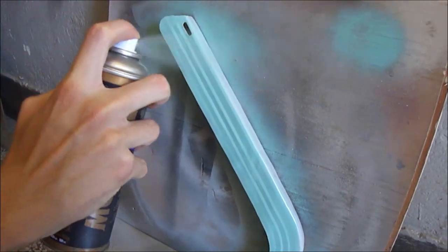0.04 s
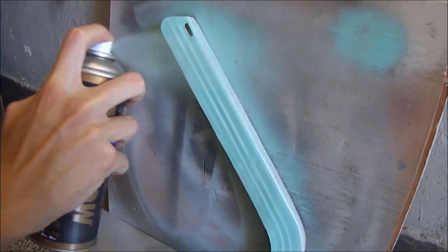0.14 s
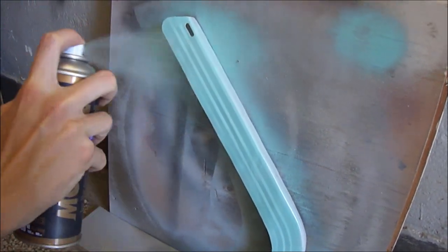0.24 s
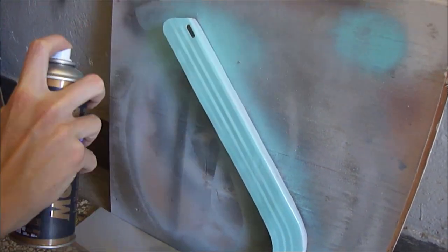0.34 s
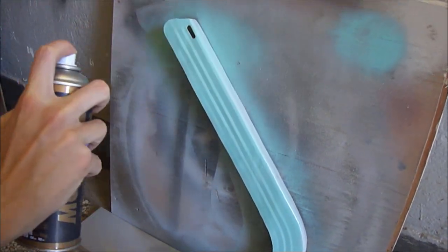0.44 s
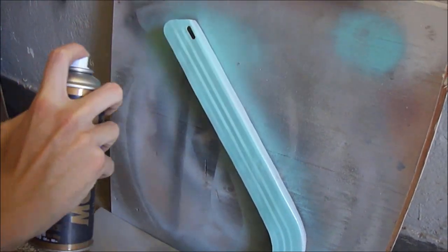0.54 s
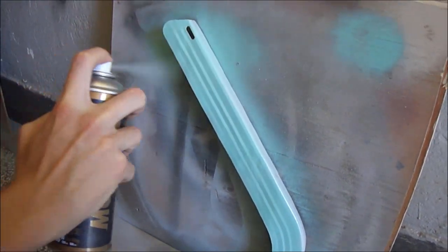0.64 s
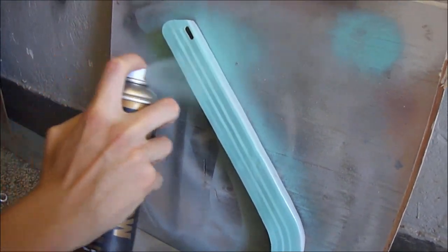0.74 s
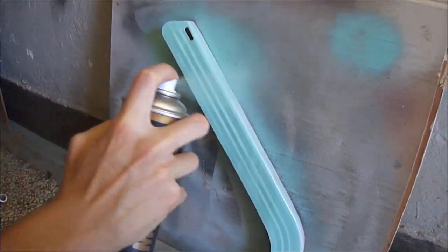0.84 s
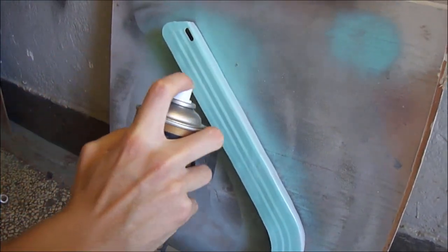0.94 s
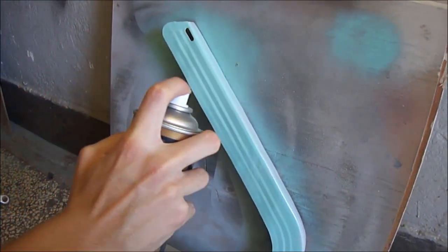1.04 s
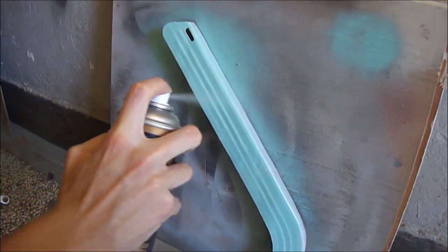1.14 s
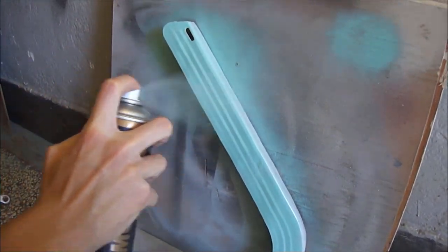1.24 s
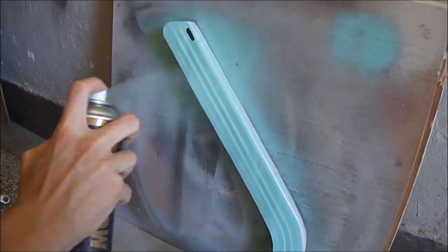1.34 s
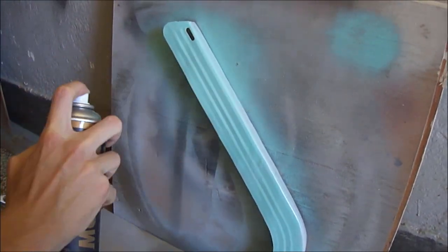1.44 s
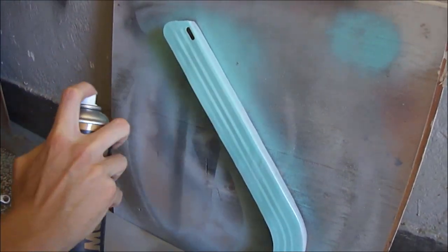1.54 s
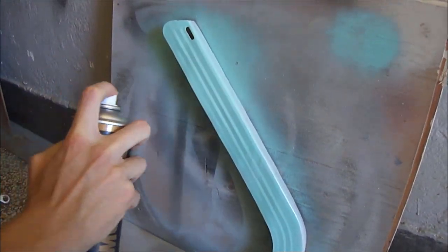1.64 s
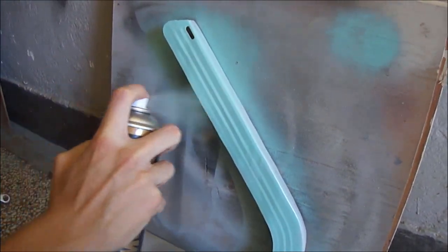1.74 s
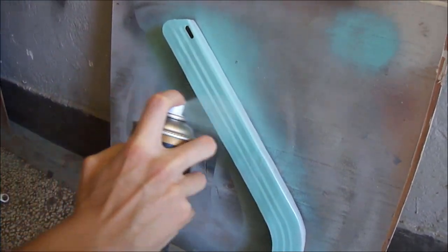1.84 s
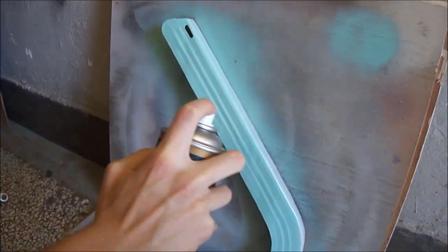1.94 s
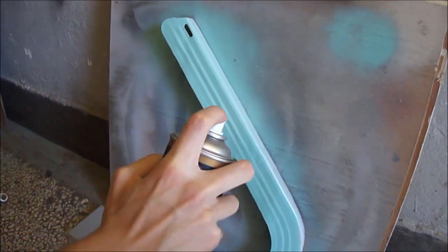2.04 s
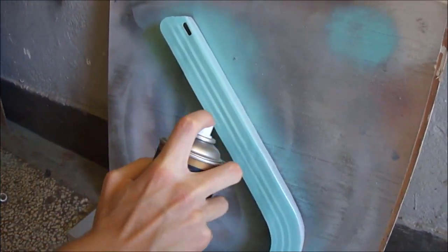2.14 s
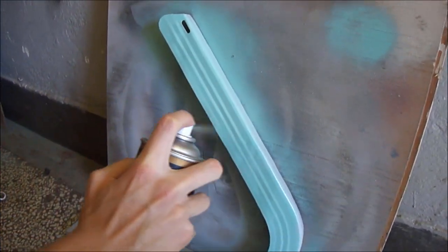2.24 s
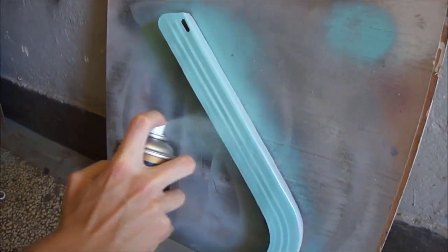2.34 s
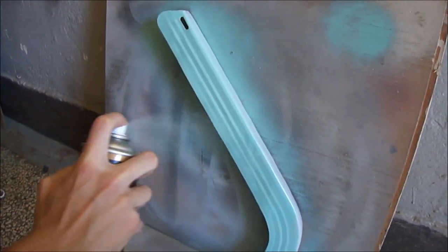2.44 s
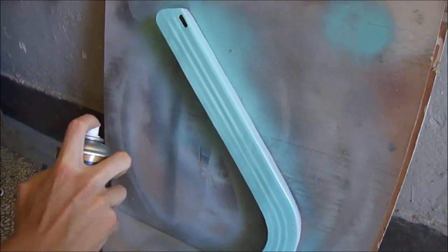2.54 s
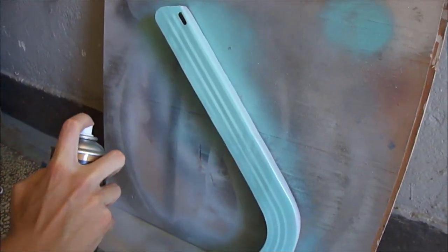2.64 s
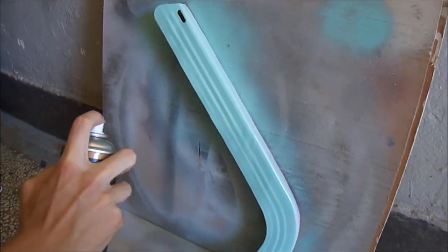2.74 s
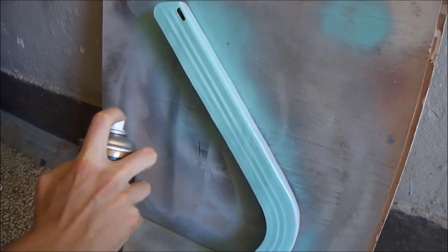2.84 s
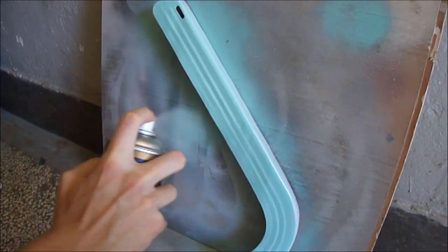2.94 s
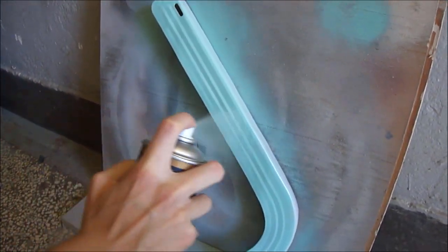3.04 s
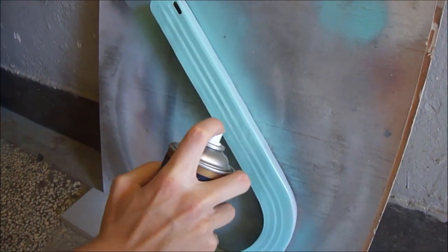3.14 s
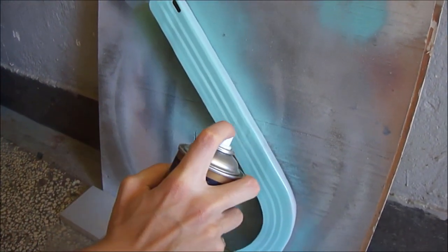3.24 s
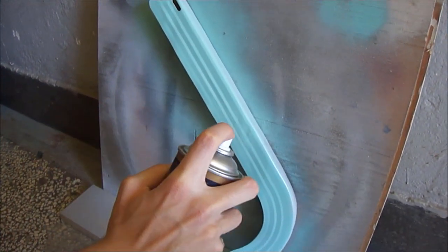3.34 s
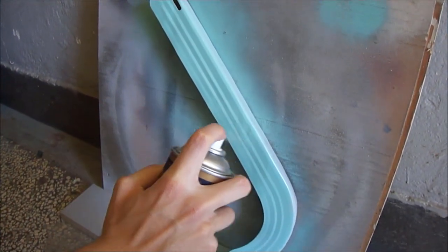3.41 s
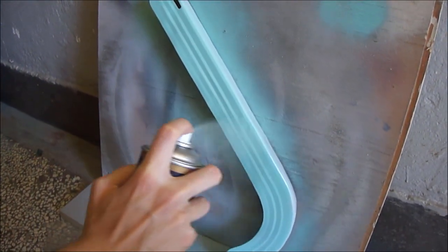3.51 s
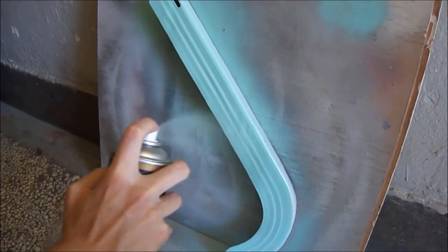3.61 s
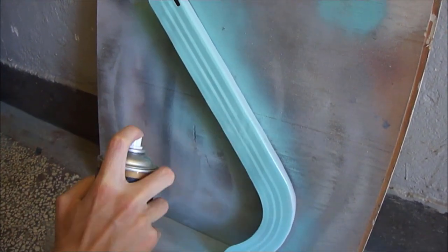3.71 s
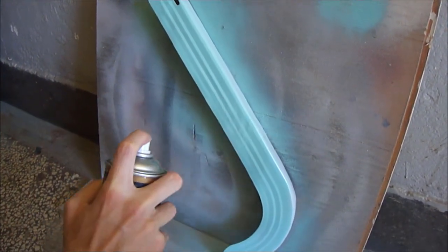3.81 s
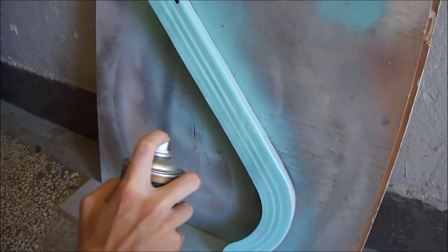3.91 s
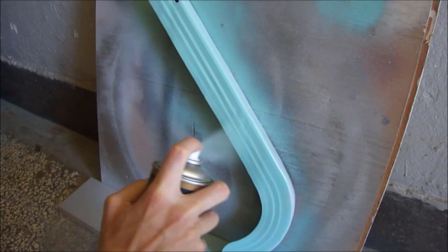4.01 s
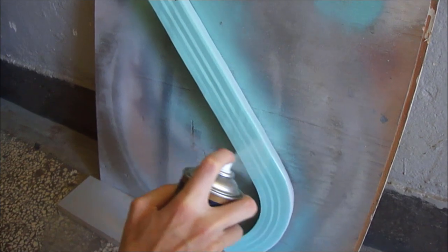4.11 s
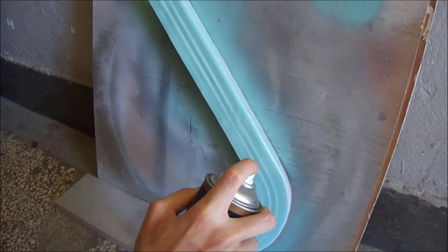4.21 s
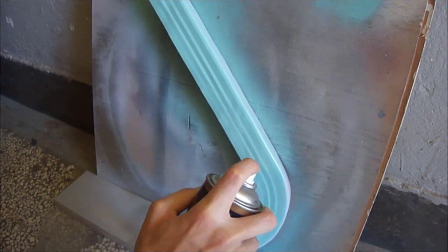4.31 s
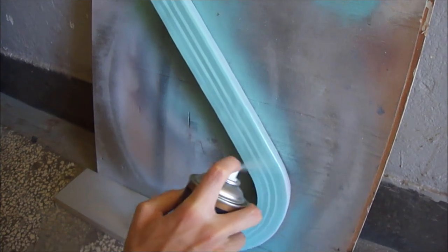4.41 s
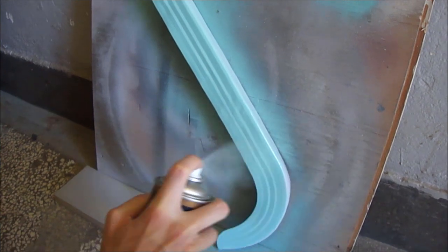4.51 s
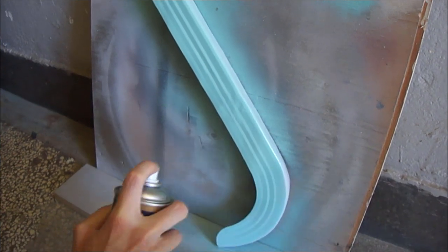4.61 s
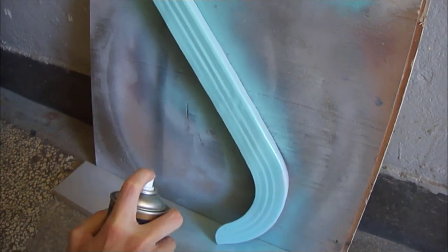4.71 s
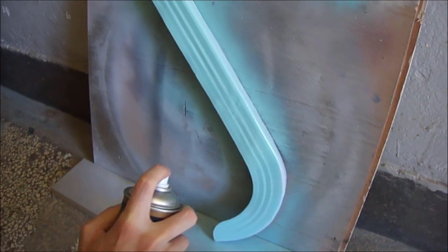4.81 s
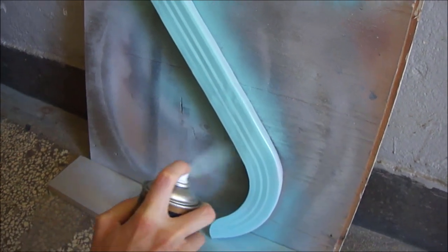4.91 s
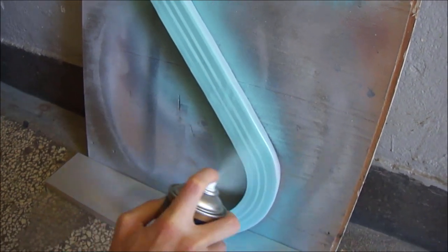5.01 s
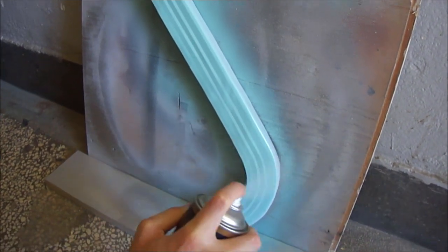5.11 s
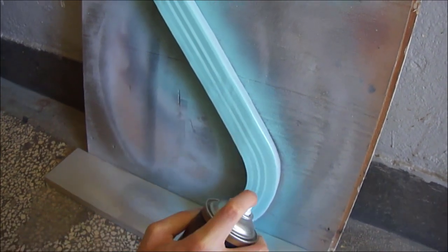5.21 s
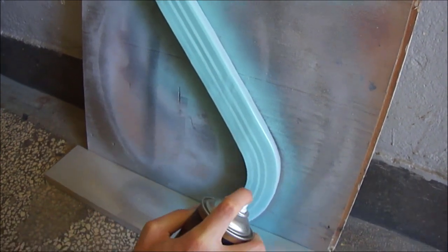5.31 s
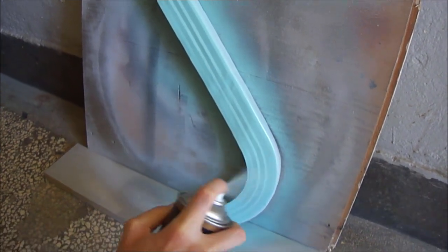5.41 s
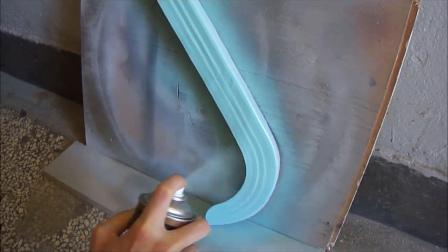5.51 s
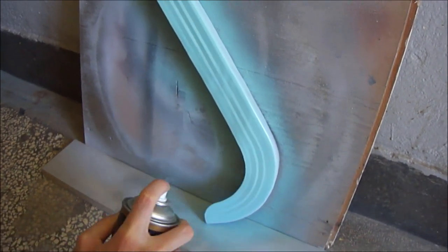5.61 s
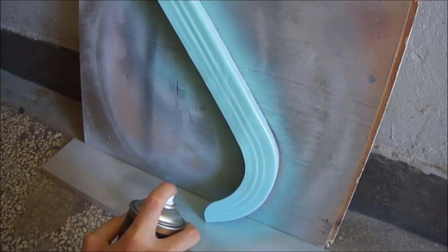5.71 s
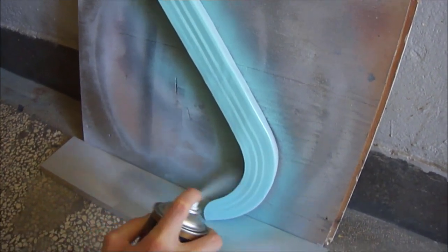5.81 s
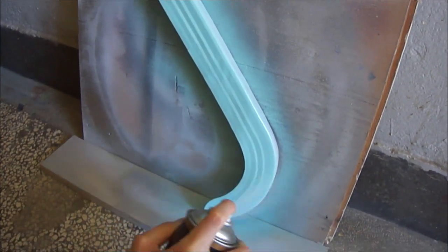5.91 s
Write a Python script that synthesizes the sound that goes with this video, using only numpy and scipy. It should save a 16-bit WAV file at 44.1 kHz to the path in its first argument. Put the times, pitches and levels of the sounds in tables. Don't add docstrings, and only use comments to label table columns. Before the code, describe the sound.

A spray can works close to a small mono microphone in a bare, lightly ringing workshop. Soft room air and a very faint low machine hum run throughout. The first burst opens almost at once with a hard cap tick at 0.08 s and hisses until about 0.36 s. Further bursts start near 0.65, 1.15, 1.7, 2.27, 2.9, 3.45, 3.97, 4.43, 4.9, 5.4 and 5.83 s, each lasting roughly 0.2 to 0.3 s, the last running to about 6 s. Each seeps, cracks open within some 50 ms, surges into bright hiss with rough body, fine fizz and a breathy whistle near 2.4 kHz, usually weakens, then shuts quickly. A strong tick comes at 1.19 s, another around 3.07 s, with fainter clicks and sputters scattered between. Close reflections give a shifting, hollow comb colour; a short tail fades into each quiet gap. Highs stop near 11 kHz.

```python
import sys
import numpy as np
from scipy import signal
from scipy.fft import rfft, irfft, next_fast_len
from scipy.io import wavfile
from scipy.ndimage import uniform_filter1d, map_coordinates

SR = 44100
rng = np.random.default_rng(int(sys.argv[2]) if len(sys.argv) > 2 else 0)


def volts(x):
    e = np.asarray(x, float) / 20
    return 10 ** e


def log_audio(samples):
    frames = np.atleast_2d(samples).T
    limited = np.clip(frames, -1, 1)
    pcm = np.round(limited * 32767).astype(np.int16)
    wavfile.write(sys.argv[1], SR, pcm)


N = 262836

# pitch_hz, level_db
AIR_COLOUR = [(25, -29), (60, -13.5), (85, -12.5), (130, -6.5), (200, -6), (320, -2), (500, -1), (1000, -2),
              (1500, -5.5), (2100, -11), (3000, -13.5), (6000, -19), (11000, -24)]
# pitch_hz, width_hz, level_db
STANDING_WAVES = [(100, 10, 9), (229, 9.1, 3.5), (396, 16, 2.5), (463, 13, 3.5), (557, 17, 2.5),
                  (2240, 67, 8.5), (7800, 90, 6)]
# pitch_hz, level_db (rms)
MACHINE_HUM = [(143, -70), (270.5, -58)]
# pitch_hz, t60_s
ROOM_DECAY = [(500, 0.92), (2500, 0.56), (6000, 0.53), (11000, 0.4)]

# surge_delay_ms, shut_delay_ms, surge_share, shut_share
BOARD_PATH = [(1.045, .935, .85, .3), (.865, .885, .22, .5), (.865, .865, .36, .1), (.785, .825, .12, .55),
              (.8, .83, .25, .36), (.835, .785, .3, .65), (.755, .825, .7, .08), (.735, .675, .22, .65),
              (.68, .74, .5, .1), (.66, .74, .15, .28), (.685, .785, .36, .2), (.615, .625, .05, .42)]
# surge_delay_ms, shut_delay_ms, surge_share, shut_share
RAIL_PATH = [(1.175, 1.125, .1, .3), (1.11, 1.13, .2, .33), (1.075, 1.175, .25, .08),
             (.925, .935, .05, .48), (1.01, .92, .08, .32), (.945, .935, .18, .18), (1.52, 1.47, .05, .42),
             (.87, .8, .24, .3), (1.285, 1.225, .33, .33), (1.195, 1.145, .24, .22), (1.05, 1.0, .52, .05),
             (1.225, 1.225, .46, .14)]
# surge_delay_ms, shut_delay_ms, surge_share, shut_share
CORNER_PATH = [(2.07, 1.89, .25, .15), (1.865, 1.855, .22, .1), (1.48, 1.43, .17, .1),
               (1.74, 1.73, .2, .12), (1.655, 1.515, .38, .12), (1.69, 1.79, .28, .12),
               (1.88, 1.81, .15, .22), (1.565, 1.505, .2, .28), (1.43, 1.37, .22, .17),
               (.535, .525, .4, .14), (.6, .65, 0, .45), (.47, .51, .12, .3)]
MIRROR = 1.3

# start_s, level_db (peak), pitch_hz, width_hz
CAP_TICKS = [(0.0842, -8.5, 4170, 5000), (0.5064, -25, 4800, 9000), (.547, -36, 5500, 3000),
             (1.032, -34, 4700, 2500), (1.051, -32, 5600, 3000), (1.1, -34, 4500, 8000),
             (1.118, -39, 5000, 2500), (1.131, -50, 5600, 2000), (1.162, -21, 4500, 12000),
             (1.186, -9, 3960, 4970), (1.588, -30.5, 5700, 5000), (1.62, -31.5, 5500, 4000),
             (1.73, -24, 10400, 2500), (2.086, -34, 5000, 3000), (2.1173, -32.5, 5600, 4000),
             (2.134, -32, 6000, 4000), (2.266, -36, 6000, 8000), (2.8182, -24.5, 2000, 9000),
             (2.9127, -22.5, 1160, 1210), (3.072, -14.5, 5500, 6900), (3.2445, -21, 3620, 3600),
             (3.972, -38, 6000, 9000), (5.83, -30, 4000, 5000)]

# open_s, surge_s, shut_s, surge_db, late_db
PRESSES = [(0.033, 0.057, 0.36, -23.5, -27.5), (0.644, 0.707, 0.9, -23, -28),
           (1.153, 1.193, 1.439, -24.5, -31), (1.721, 1.769, 1.95, -25, -27),
           (2.265, 2.322, 2.534, -23, -29.5), (2.878, 2.917, 3.148, -26, -24),
           (3.446, 3.479, 3.699, -21, -27.5), (3.967, 4.015, 4.204, -25, -26),
           (4.434, 4.470, 4.628, -21, -29.5), (4.907, 4.947, 5.17, -28.5, -25.5),
           (5.396, 5.440, 5.587, -24.5, -28.5), (5.826, 5.865, 6.015, -25.5, -33.5)]
# crack_part (of the rise, 0-1), sag_place (in the hold, 0-1), sag_db
FINGER_FEEL = [(0.5, .45, -2.5), (0.37, 0.2, -2), (.4, 0.2, -1), (0.39, 0, -0.5), (0.34, 0.2, -2),
               (0.37, 0.33, -4), (0.29, 0.55, -4), (0.44, 0.4, -2.5), (0.29, 0.1, -1), (0.39, 0.3, -1),
               (0.39, 0.2, -3), (0.4, 0.5, 0)]
# whistle_open_db, whistle_shut_db, fizz_open_db, fizz_shut_db, roar_db
NOZZLE_AIM = [(-3.5, -0.76, -.5, 0.44, 0.5), (-0.5, -0.75, -2, -1.5, -0.5), (-0.5, -0.63, -2.5, 0.23, -0.5),
              (-0.5, -0.63, 0.5, -0.13, 0), (5, -3, -2, 2, -0.5), (1, 1, 2, -0.83, 0),
              (4, 0.52, -2.5, 1.7, 1), (-1, -0.35, 0, -1.3, 0.5), (2.5, 0.65, -0.5, 2.1, 1),
              (6, 0, 2, -2.2, 0.5), (5, -0.13, 0, 0.5, 0), (-5, 1.7, 2, -0.29, 1.5)]
# pitch_hz, level_db
ROAR_COLOUR = [(150, -30), (300, -16.5), (500, -11.5), (800, -3.5), (1100, -2.5), (1550, 0), (2000, -0.5),
               (2800, -9.5), (4500, -18)]
# pitch_hz, level_db
HISS_COLOUR = [(1800, -32.5), (2800, -8.5), (3600, -4.5), (4800, -0.5), (6300, -1), (7600, -5.5),
               (9500, -19)]
# pitch_hz, level_db
FIZZ_COLOUR = [(5500, -39.5), (7000, -3.5), (8300, 0.5), (9500, 3), (10800, 5.5), (14000, -4.5)]
# pitch_hz, width_hz, level_db
CAP_HOLLOW = [(2476, 107, -0.5), (2256, 284, -8)]

SEEP_DB = -66
CRACK_DB, KNEE_DB = -14.5, -4.5
LIFT_S, LIFT_DB = 0.031, -4
USUAL_DB, WEAKEST_DB = -27, -35
ROAR_DB, FIZZ_DB = -10, -2.5
ROAR_LAGS, FIZZ_LAGS = 0.36, 0.58
WHISTLE_DB, WHISTLE_START_DB, WHISTLE_BUILDS_S = -7, -8, 0.02

# pitch_hz, width_hz, level_db
MIC_PORT = [(2315, 580, 2.5), (8000, 260, 2)]
TOP_HZ = 11060


def unit(x):
    return x / np.sqrt(np.mean(x ** 2) + 1e-20)


def along(points, hz):
    f, v = np.transpose(points)
    return np.interp(np.log(hz + 1), np.log(f + 1), v)


def curve(rows):
    s, value = np.transpose(rows)
    return np.interp(np.arange(N) / SR, s, value)


def per_press(at_opening, at_shutting):
    rows = []
    for press, first, last in zip(PRESSES, at_opening, at_shutting):
        rows += [(press[1], first), (press[2], last)]
    return curve(rows)


def wobble(rate):
    knots = rng.standard_normal(int(N * rate / SR) + 4)
    return map_coordinates(knots, [np.arange(N) * rate / SR])


def filtered(x, response):
    m = next_fast_len(N + SR // 2)
    return irfft(rfft(x, m) * response(np.fft.rfftfreq(m, 1 / SR)), m)[..., :N]


def resonance(f, hz, width):
    return 1j * f * width / (hz * hz - f * f + 1j * f * width)


def peaks(f, modes):
    return 1 + sum((volts(db) - 1) * resonance(f, hz, width) for hz, width, db in modes)


def rush(spectrum, patchy_db):
    z = signal.stft(rng.standard_normal(N + 512), nperseg=512)[2]
    field = uniform_filter1d(rng.standard_normal(z.shape), size=5, axis=0)
    field = uniform_filter1d(field, size=8, axis=1)
    noise = signal.istft(z * volts(patchy_db * unit(field)), nperseg=512)[1][:N]
    return unit(filtered(noise, lambda hz: volts(along(spectrum, hz))))


def background():
    t = np.arange(N) / SR
    drift = np.cumsum(wobble(9)) / SR
    hum = 0
    for hz, db in MACHINE_HUM:
        level = volts(db + 2.0 + 2.5 * wobble(14))
        hum = hum + level * np.sin(2 * np.pi * hz * (t + 0.013 * drift))
    air = filtered(rush(AIR_COLOUR, patchy_db=1.77), lambda f: peaks(f, STANDING_WAVES))
    return volts(-46.0 + 0.16 * wobble(2.2)) * air + hum


def workshop(x):
    hz, t, z = signal.stft(rng.standard_normal(SR), SR, nperseg=256)
    decay = volts(-60 * t / along(ROOM_DECAY, hz)[:, None])
    tail = signal.istft(z * decay, SR, nperseg=256)[1]
    return signal.fftconvolve(np.pad(x, (300, 0)), tail / np.linalg.norm(tail))[:N]


def board(x):
    bright = filtered(x, lambda f: f * f / (f * f + 1900 ** 2))
    copies, power = 0, 1
    for path in (BOARD_PATH, RAIL_PATH, CORNER_PATH):
        columns = np.transpose(path)
        delay_ms = per_press(*columns[:2])
        share = np.minimum(MIRROR * per_press(*columns[2:]), 1)
        late = map_coordinates(bright, [np.arange(N) - delay_ms * SR / 1000], order=5)
        copies = copies + share * late
        power = power + share ** 2
    return (x + copies) / np.sqrt(power)


def ticks():
    out, t = np.zeros(N + SR), np.arange(2048) / SR
    f = np.fft.rfftfreq(len(t), 1 / SR)
    for s, db, hz, width in CAP_TICKS:
        crack = volts(-60 * t / 0.022) * rng.standard_normal(len(t))
        crack[0] = 4.5
        crack = irfft(rfft(crack) * resonance(f, hz, width) * resonance(f, hz, 2 * width))
        out[round(s * SR):][:len(t)] += volts(db) * crack / np.abs(crack).max()
    return out[:N]


def flow():
    rows = []
    for press, (crack, sag, sag_db) in zip(PRESSES, FINGER_FEEL):
        opens, surge, shuts, surge_db, late_db = press
        rise = surge - opens
        rows += [
            (opens, SEEP_DB),
            (opens + crack * rise, surge_db + CRACK_DB),
            (opens + (1 + crack) / 2 * rise, surge_db + KNEE_DB),
            (surge, surge_db),
            (surge + sag * (shuts - surge), surge_db + sag * (late_db - surge_db) + sag_db),
            (shuts - LIFT_S, late_db),
            (shuts, late_db + LIFT_DB),
            (shuts + .03, late_db + LIFT_DB)]
    return curve(rows)


def hollow():
    def response(f):
        total = 0
        for k, (hz, width, db) in enumerate(CAP_HOLLOW):
            total = total + (-1) ** k * volts(db) * resonance(f, hz, width)
        return total
    return unit(filtered(rng.standard_normal(N), response))


def jet():
    t, flow_db = np.arange(N) / SR, flow()
    weak_db = USUAL_DB - np.maximum(flow_db, WEAKEST_DB)
    aim = np.transpose(NOZZLE_AIM)
    roar_db = per_press(aim[4], aim[4]) + ROAR_DB + ROAR_LAGS * weak_db
    fizz_db = per_press(*aim[2:4]) + FIZZ_DB + FIZZ_LAGS * weak_db

    opens = np.array([press[0] for press in PRESSES])
    since = t - opens[np.maximum(np.searchsorted(opens, t) - 1, 0)]
    build_db = WHISTLE_START_DB * np.exp(-np.abs(since) / WHISTLE_BUILDS_S)
    whistle_db = per_press(*aim[:2]) + WHISTLE_DB + build_db

    valve = 0
    for press in PRESSES:
        opening, shutting = (t - press[0]) / 0.0031, 1 + (press[2] - t) / 0.019
        valve = valve + np.clip(np.minimum(opening, shutting), 0, 1)
    flutter = volts(0.31 * wobble(35) + 0.88 * wobble(180) + 1.03 * wobble(900))

    hiss = rush(HISS_COLOUR, patchy_db=0.63)
    roar = volts(roar_db) * rush(ROAR_COLOUR, patchy_db=1.0)
    fizz = volts(fizz_db + 3.0) * rush(FIZZ_COLOUR, patchy_db=1.0)
    whistle = volts(whistle_db - 3) * hollow()
    return valve * volts(flow_db) * unit(flutter) * (hiss + roar + fizz + whistle)


def scene():
    spray, cap = jet(), ticks()
    ring = volts(-8.5) * workshop(spray + cap)
    return (board(spray) + cap + ring + background())[None]


def low_pass(x):
    return signal.sosfilt(signal.butter(12, 13420, fs=SR, output="sos"), x)


def record(dry):
    loud = uniform_filter1d(np.abs(dry), size=900) > .014
    leak = loud * (wobble(26) > .1) * volts(-23) * dry
    sliver = filtered(leak, lambda f: np.exp(-((f - 13100) / 100) ** 4))
    port = filtered(dry, lambda f: peaks(f, MIC_PORT) * np.clip((TOP_HZ - f) / 120, 0, 1))
    return low_pass(port + sliver)


dry = scene()
out = record(dry)
log_audio(out)
```